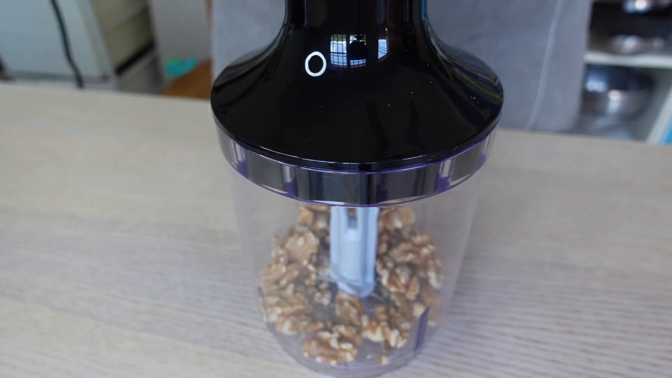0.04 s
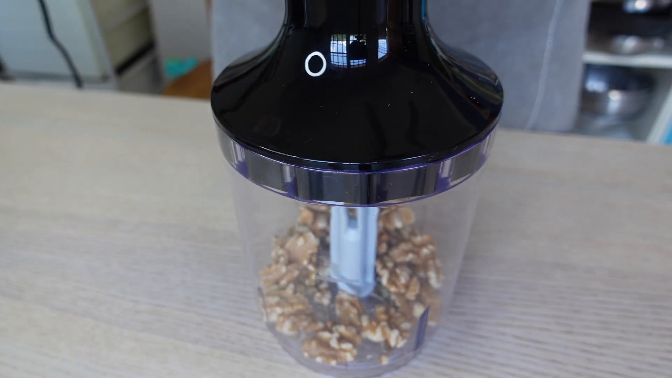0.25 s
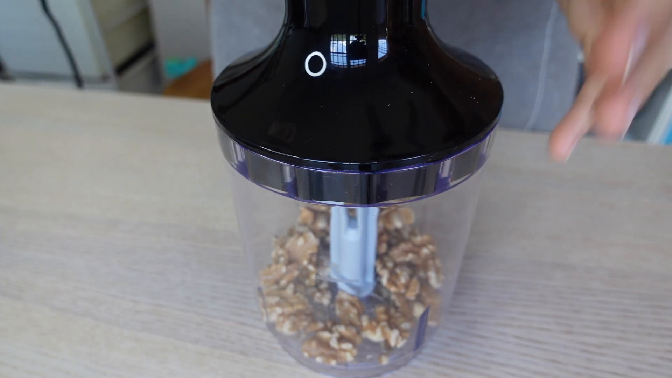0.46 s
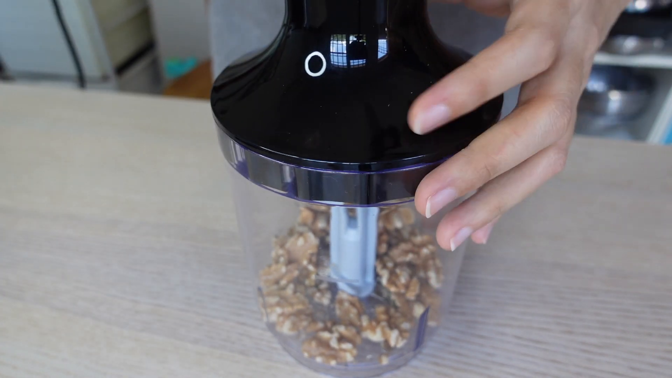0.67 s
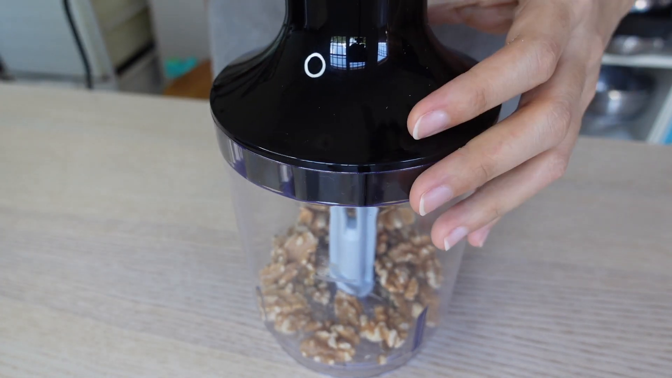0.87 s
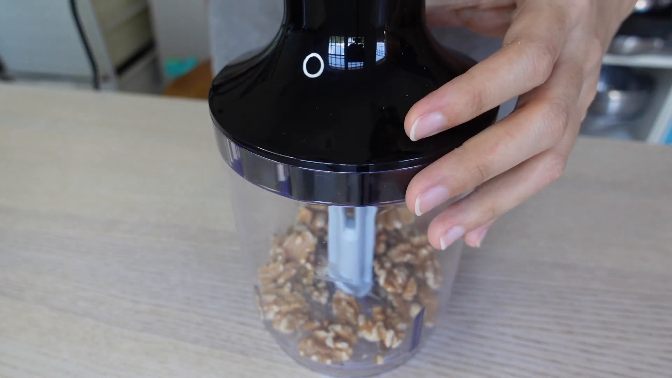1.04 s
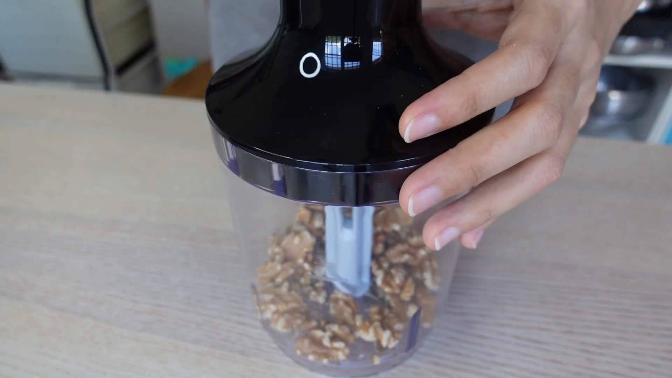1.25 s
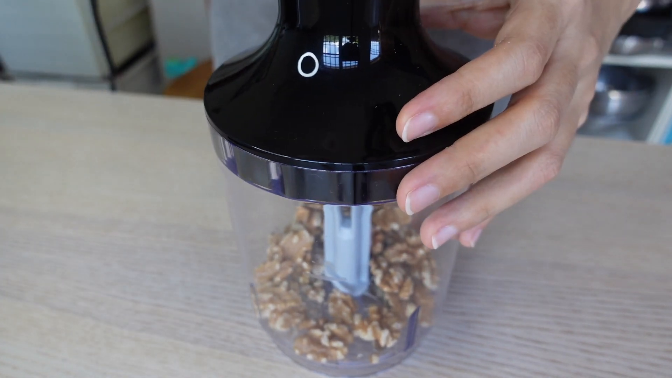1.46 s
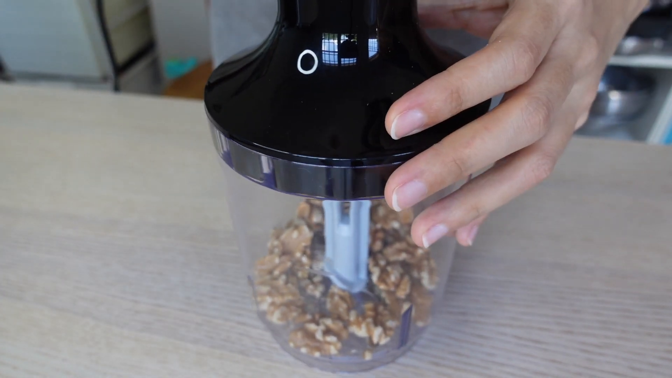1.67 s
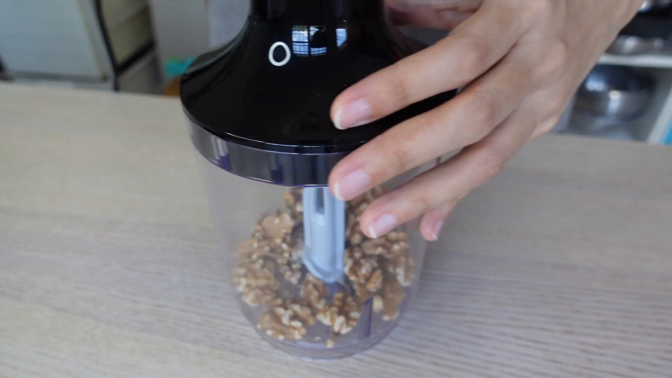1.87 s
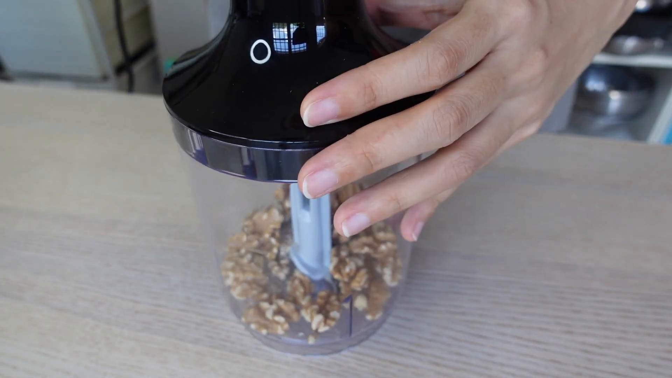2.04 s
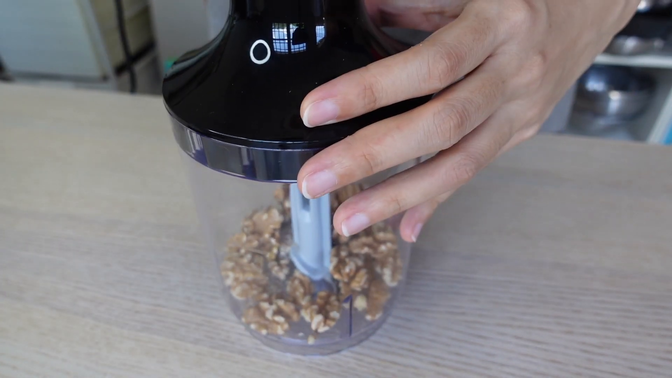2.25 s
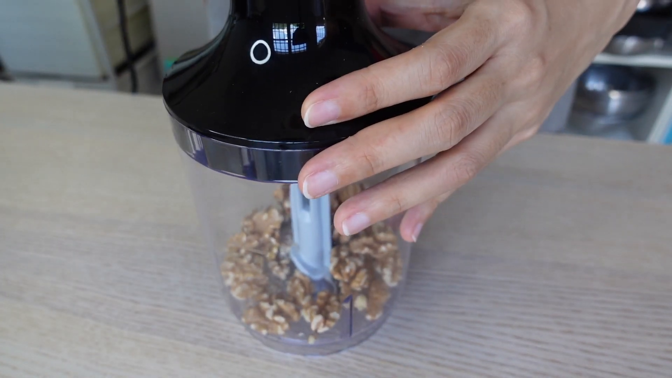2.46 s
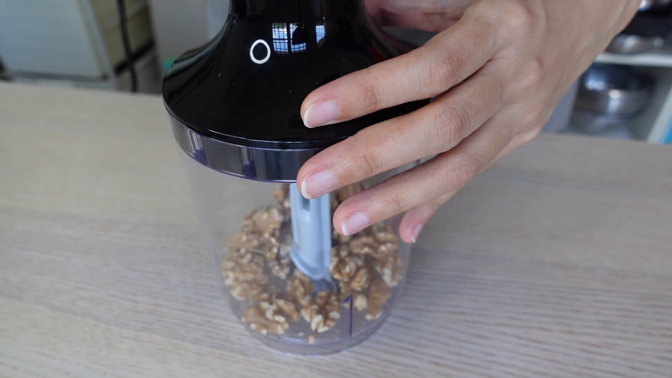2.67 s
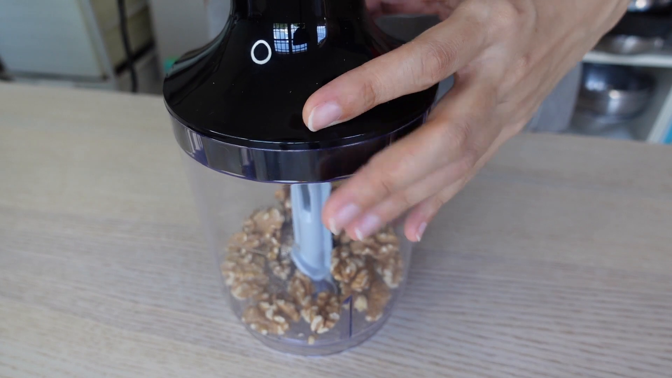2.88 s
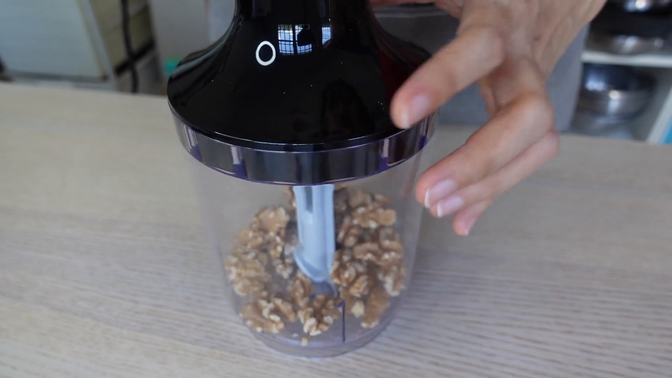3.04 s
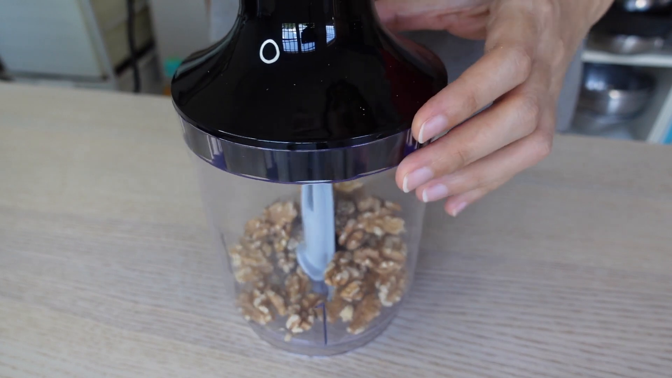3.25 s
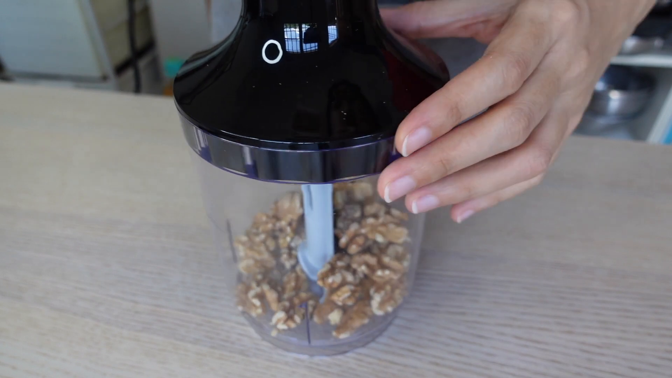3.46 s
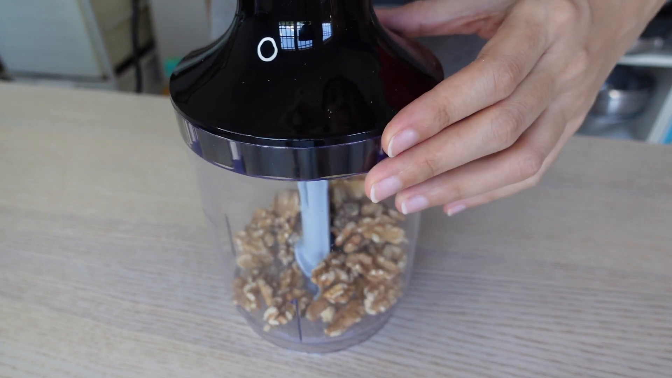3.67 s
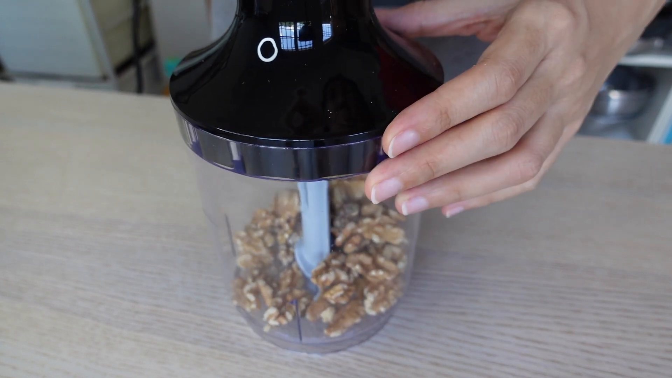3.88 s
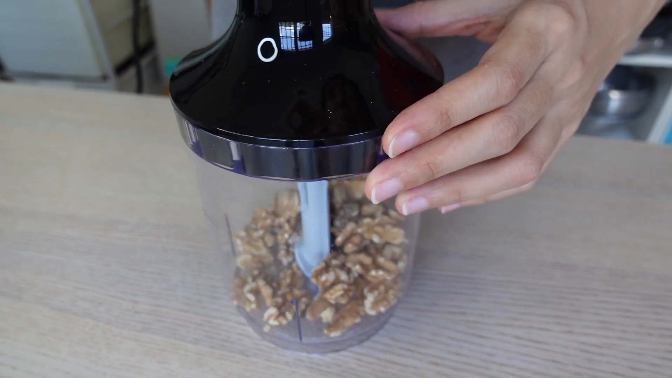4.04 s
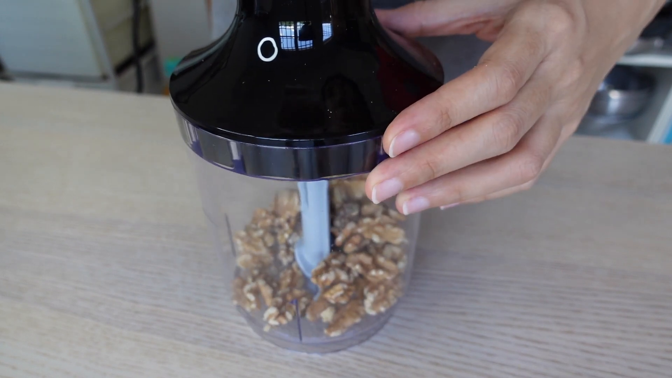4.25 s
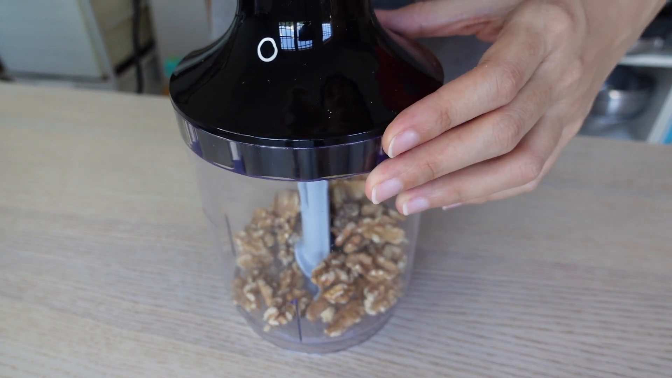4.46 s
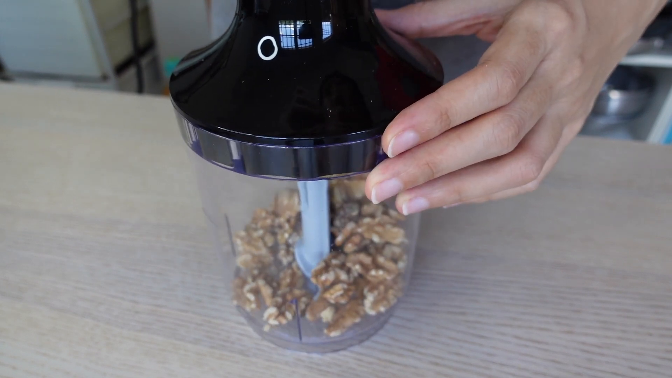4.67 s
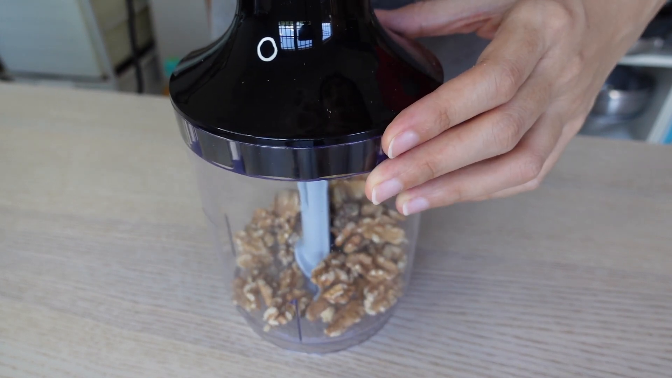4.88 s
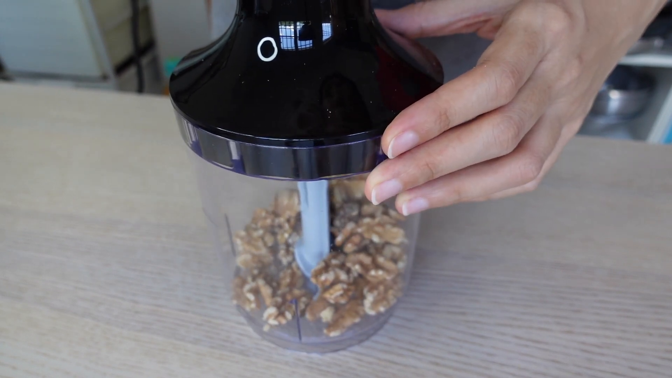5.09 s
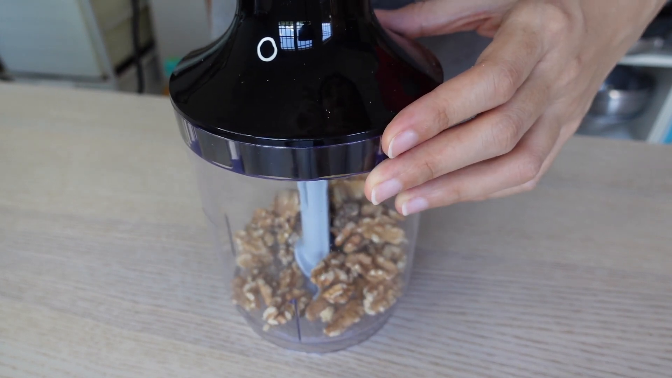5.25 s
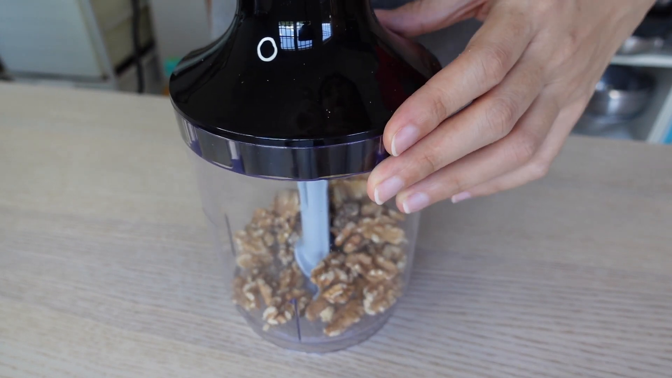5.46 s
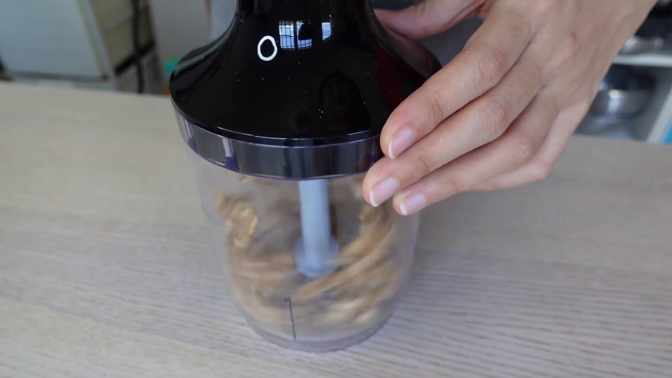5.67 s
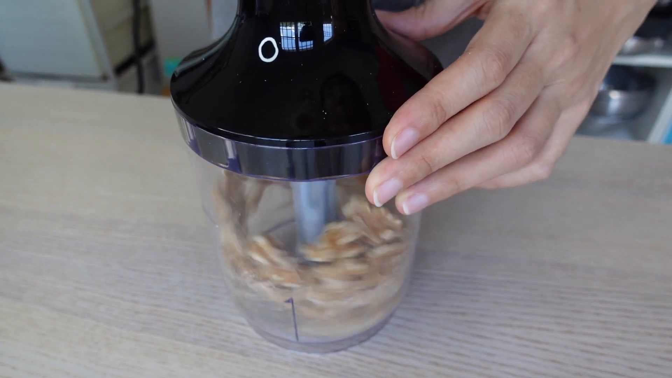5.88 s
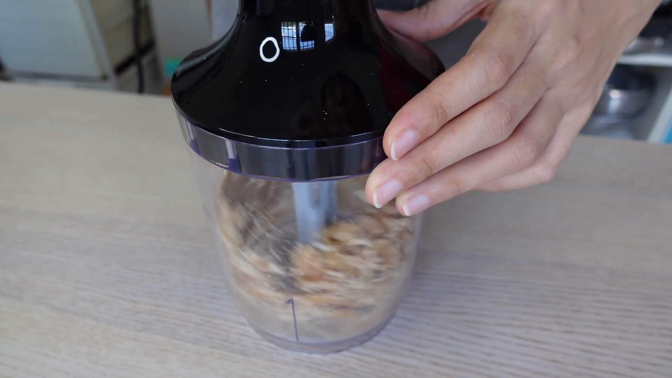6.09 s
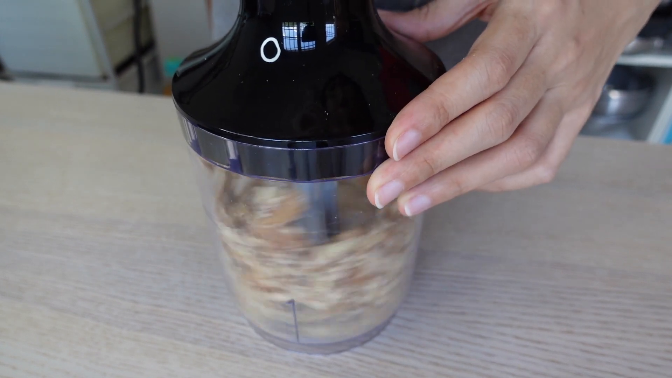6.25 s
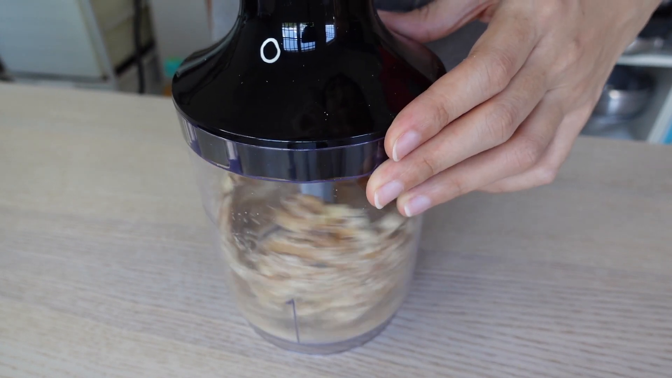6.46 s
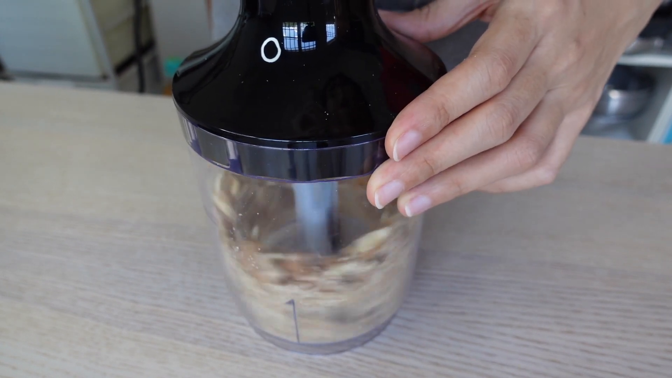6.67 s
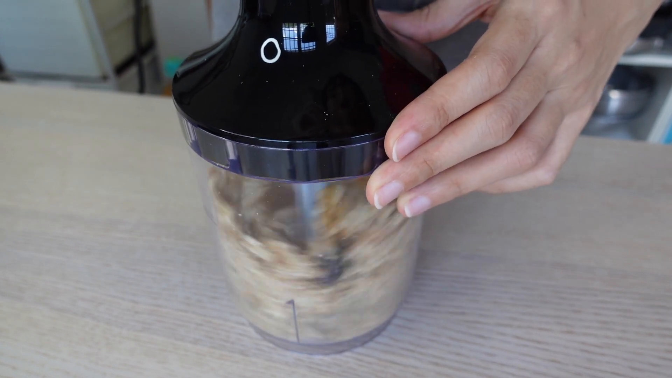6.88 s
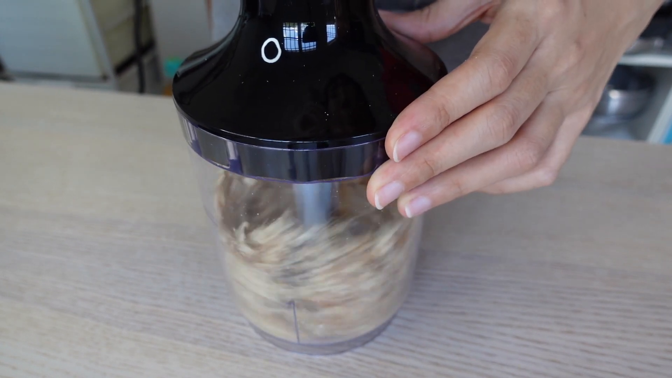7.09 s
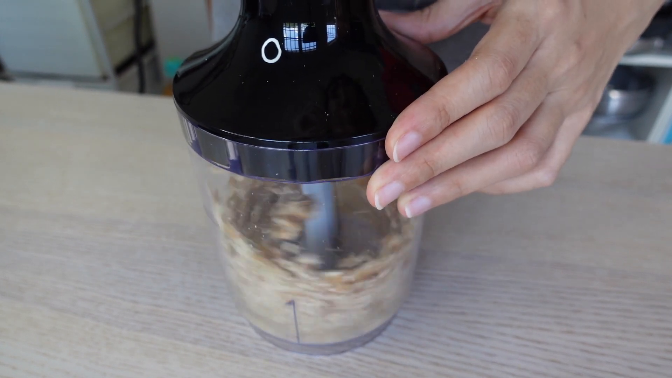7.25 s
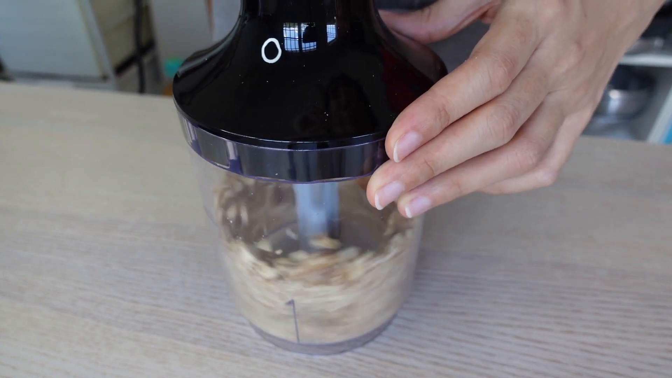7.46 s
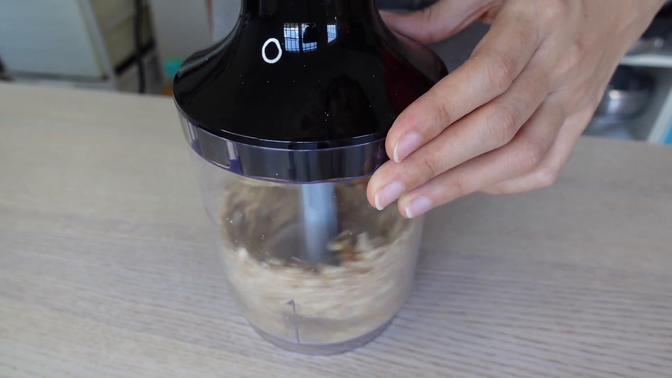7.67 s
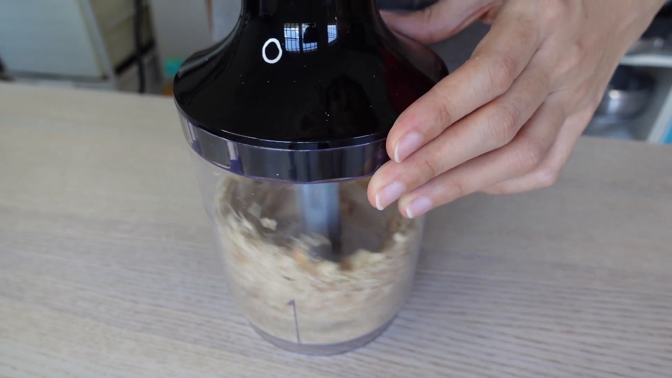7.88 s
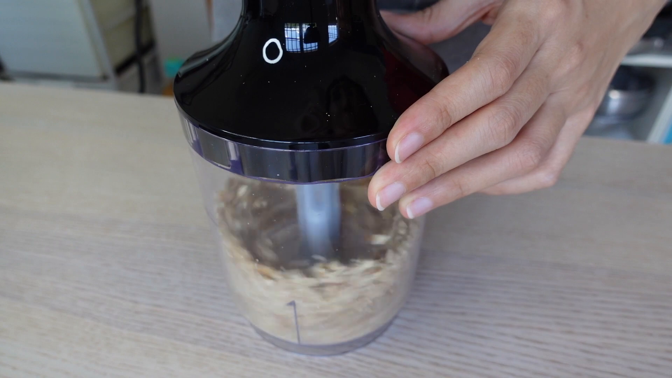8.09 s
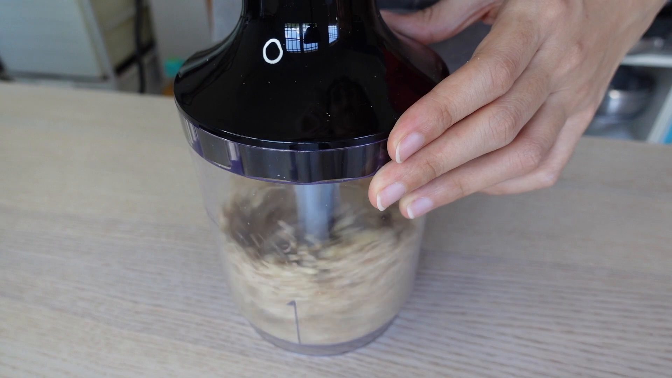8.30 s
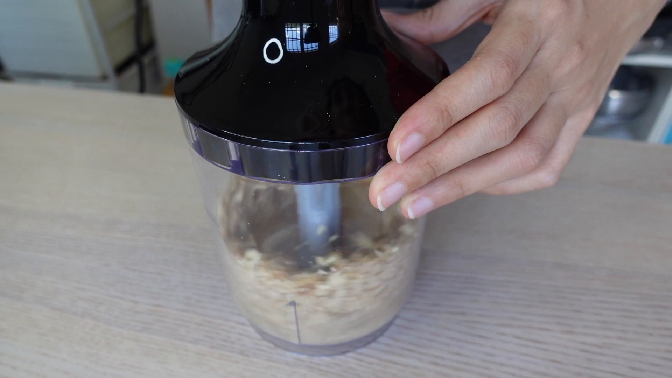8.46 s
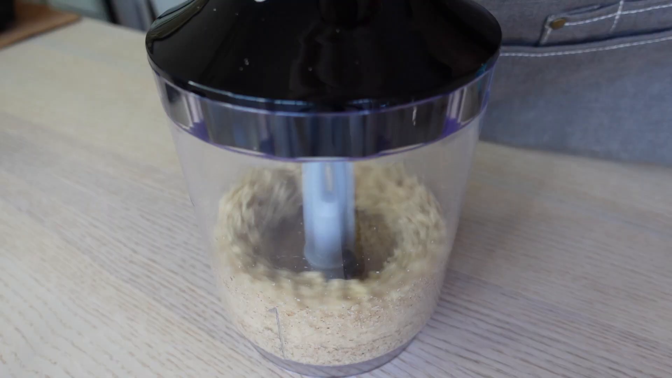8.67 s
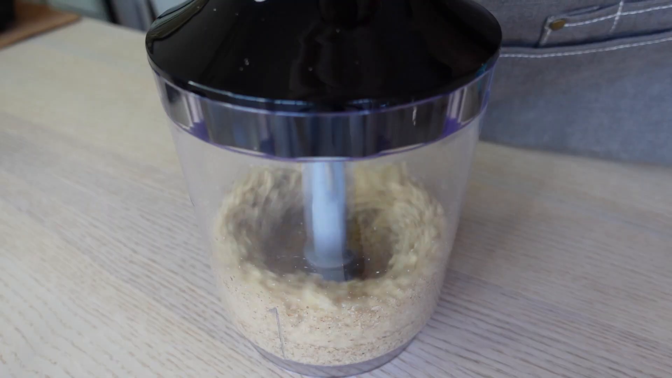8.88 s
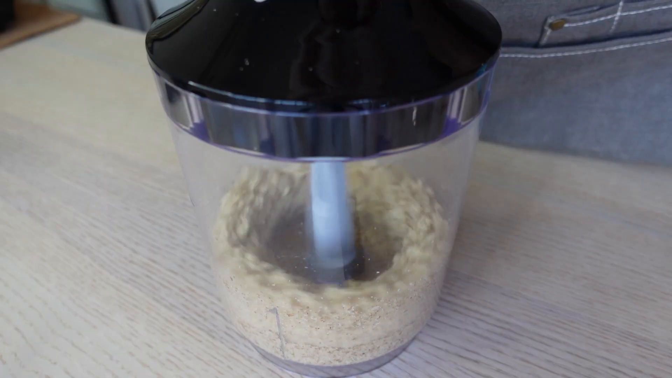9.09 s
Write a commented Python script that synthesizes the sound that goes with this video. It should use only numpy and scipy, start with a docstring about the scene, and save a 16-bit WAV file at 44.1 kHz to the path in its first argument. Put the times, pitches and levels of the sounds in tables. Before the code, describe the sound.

On a wooden table, a hand taps a plastic chopper lid, knocks the bowl and slides it, with two loud cracking snaps around two seconds. Faint rustles and a low drone fill a pause. The button creaks and clicks, and the blade hurls nut pieces at the plastic wall in one loud continuous burst, finishing finer and whinier. Close microphone, little room echo.

```python
"""Nut chopper on a wooden table

A hand taps the lid, the plastic bowl slides, the motor unit snaps in and the button creaks: shaped noise and a thud.
Then the blade flings nut pieces at the wall: random impacts through resonances, over a hum at multiples of the turning
rate. At the end the nuts are fine meal and the motor whines. Low tones over room noise stand for an appliance's drone
and swell with the low ring of the table at the hits near 1.2 and 2.4 s; the sound is nearly mono.
"""
import sys
import numpy as np
from scipy import signal
from scipy.fft import rfft, irfft, next_fast_len
from scipy.io import wavfile
from scipy.ndimage import uniform_filter1d, map_coordinates

SR = 44100
rng = np.random.default_rng(int(sys.argv[2]) if len(sys.argv) > 2 else 0)


def dump(signal):
    """Clip the signal to [-1, 1] and save it as 16-bit WAV at the path in sys.argv[1]."""
    limited = np.clip(np.atleast_2d(signal).T, -1, 1)
    pcm = np.round(limited * 32767).astype(np.int16)
    wavfile.write(sys.argv[1], SR, pcm)


N = 402633
T = np.arange(N) / SR  # time of each sample in seconds

# The chopper in coarse pieces, then in fine meal. Each row: time in seconds, rattle, tumble and knocks in dB.
COARSE_LEVELS = [(5.662, -18.5, -25, -28), (5.68, -19.5, -25, -17), (5.8, -16.5, -23, -22),
                 (6.3, -14.5, -23.5, -26), (7.2, -14.5, -22.5, -27.5), (8, -14.5, -22.5, -24),
                 (8.71, -14.5, -21.5, -25.5)]
MEAL_LEVELS = [(8.71, -15, -21.5, -46), (9.13, -14.5, -20.5, -27)]
# Resonances of the bowl wall, the gear housing and the lid. Each row: centre in Hz, width in Hz, lift in dB.
WALL_MODES = [(2415, 96, 7), (3055, 310, 5.5), (4130, 210, 4.5), (5216, 196, 3), (5920, 290, 4.5),
              (6850, 500, 5.5), (8340, 480, 4.5), (10075, 158, 6)]
HOUSING_MODES = [(2180, 300, -0.5), (2790, 53, 9), (3420, 370, 3), (4290, 150, 8), (5450, 290, 5),
                 (6530, 220, 5.5), (7300, 540, 4.5), (9140, 200, 6), (14240, 300, 14.5)]
LID_MODES = [(2086, 67, 4), (3140, 150, 0.5), (3650, 220, 4.5), (5840, 370, 6.5), (8100, 570, 4)]
# Colours of the rattle and the tumble. Each row: frequency in Hz, relative level in dB per Hz.
COARSE_RATTLE = [(760, -51), (1300, -9), (3500, -6), (5830, 0), (6340, -7.5), (7040, -5), (10300, -11.5),
                 (15700, -22)]
MEAL_RATTLE = [(760, -41.5), (1300, -8.5), (1870, -11.5), (2190, 0), (2590, -13), (3390, -2), (3800, -7),
               (7410, -9), (15700, -36)]
COARSE_TUMBLE = [(15, -61), (25, -63), (80, -96), (91, -43), (112, -6), (151, -15), (212, -3.5), (296, 3.5),
                 (633, -0.5), (854, -6.5), (1090, 0), (1700, -18), (2210, -19), (3740, -120)]
MEAL_TUMBLE = [(15, -68), (25, -38), (80, -42), (114, -8), (165, -19), (231, 6), (266, -2.5), (600, -2),
               (782, -6.5), (1060, -4), (1700, -20), (2210, -64), (3740, -120)]
# Hum of the motor under load, then in meal. Each row: multiple of the turning rate, rms level in dB before wavering.
LOADED_ORDERS = [(1, -47.5), (2, -36.5), (10, -42)]
FREE_ORDERS = [(1, -35), (2, -32.5), (3, -32.5), (5, -30.5), (9, -30), (10, -31), (17, -31.5), (19, -39),
               (24, -36), (27, -34), (36, -40), (120, -55)]
# Taps and snaps. Each row: start in seconds, crack peak in dB, thud peak in dB, crack length in seconds,
# crack centre in Hz, treble edge in dB.
TAPS = [(.462, -40, -40, 0.0032, 4640, -16), (.506, -37, -44, 0.0052, 1950, -22),
        (.70, -44, -34.5, .003, 1900, -20), (.771, -21.5, -21, 0.003, 1950, -33),
        (.777, -28, -50, 0.0021, 5700, -17), (.787, -35, -26.5, 0.0018, 5500, -12),
        (1.0105, -20, -14, 0.00318, 1480, -37), (1.156, -45, -32, 0.0047, 1540, -29.5),
        (1.2025, -22.5, -10.5, 0.0053, 1530, -32), (1.294, -37, -29, .004, 2090, -25),
        (1.3125, -23, -14, 0.0049, 1890, -18), (1.353, -21.5, -26, 0.0018, 6130, -21),
        (1.599, -43, -47, 0.0095, 6400, -7), (1.611, -16.5, -9, 0.0032, 1250, -34.5),
        (2.0095, -5, -14, 0.0062, 1330, -8), (2.026, -26, -12, 0.0034, 1040, -19),
        (2.097, -45, -22.5, .003, 1260, -17.5), (2.293, -15, -21, 0.0084, 3150, -1),
        (2.316, -19, -40, 0.0031, 3680, -8), (2.327, -5.5, -10, 0.0044, 3500, -1.5),
        (3.519, -41, -34.5, 0.0023, 2000, -16), (4.75, -46, -54, .003, 5860, -16),
        (5.657, -6.5, -28, 0.0018, 4080, -4)]
# Button creaks. Each row: start in seconds, peak in dB, length in seconds.
CREAKS = [(5.405, -50.5, 0.0033), (5.418, -39, .008), (5.469, -43.5, 0.013), (5.519, -35.5, .012),
          (5.53, -28.5, 0.0045), (5.537, -36.5, 0.038), (5.593, -30, 0.024), (5.602, -27, .004),
          (5.61, -24.5, 0.0069), (5.62, -28, 0.015), (5.637, -31, 0.012)]
# Resonances of the table top. Each row: centre in Hz, width in Hz, relative level in dB.
TABLE_MODES = [(122, 8, -5), (190, 103, -0.5), (186.3, 7.6, 4.5), (206.6, 6.5, 2), (274, 19, -4),
               (434, 27, -7), (620, 45, -20.5), (947, 187, -33), (1200, 180, -33)]
# Pushes of the bowl over the table. Each row: peak time, rise and fall in seconds (over 20 dB),
# then hiss, drag and table boom in dB.
PUSHES = [(1.93, 0.2, 0.16, -34.5, -29.5, -31.5), (2.049, 0.088, 0.075, -39, -28.5, -28),
          (2.3, 0.0099, .08, -44, -35, -28.5), (2.365, 0.042, .12, -28, -21, -14),
          (2.428, 0.099, 0.097, -44, -39, -17.5), (2.91, .04, .3, -60, -63, -62),
          (3.07, 0.13, 0.253, -52.5, -56, -63), (3.18, 0.086, .22, -48.5, -57, -47),
          (3.37, .1, .4, -53, -70, -50.5), (3.55, .07, 0.094, -47.5, -51, -44)]
# Brushes of a sleeve and fingers. Each row: peak time in seconds, fall in seconds (over 20 dB, sign ignored), level in dB.
BRUSHES = [(.054, 0.2, -45.5), (.2, 0.06, -55), (.326, 0.28, -46.5), (.476, -0.5, -60), (.52, 0.7, -59),
           (.688, 0, -58), (.82, 0.8, -60), (.906, .15, -65), (.99, 0.3, -61), (3.69, 0.23, -55),
           (4.35, 0.06, -49.5), (4.515, 0.4, -58), (4.55, 0, -60), (4.64, 0.5, -67), (4.754, 0.2, -53.5),
           (4.934, 0.05, -53.5)]
# Colours of the plastic foot, its drag and the cloth. Each row: frequency in Hz, relative level in dB per Hz.
FOOT_HISS = [(880, -29.5), (1500, -0.5), (2550, -11.5), (3100, -9), (3390, -9.5), (4420, -3), (6740, 0.5),
             (8710, -7), (15700, -23.5)]
DRAG_COLOUR = [(210, -31.5), (350, 2), (522, -2), (835, -3.5), (937, -4), (1200, -8), (1620, -35),
               (2200, -39), (2860, -48.5), (4840, -120)]
CLOTH_COLOUR = [(410, -39), (700, -18.5), (920, 2.5), (1240, -2), (1380, -6.5), (2290, -1.5), (3170, 1.5),
                (15100, -5), (15700, 1)]
# Low tones of the appliance and the table. Each row: frequency in Hz, level in dB against the swell.
LOW_TONES = [(85, -17), (113, -1), (140.5, -3), (169, -12), (197, -12), (215, -11)]
# Level of the low tones: the drone, swelling with the low ring of the table at the hits near 1.2 and 2.4 s.
# Each row: time in seconds, level in dB.
LOW_TONE_SWELL = [(0.0, -38), (0.2, -43.5), (0.5, -40.5), (0.8, -47), (1.18, -34.5), (1.4, -46),
                  (2.07, -50.5), (2.43, -34), (2.7, -48.5), (3.06, -43.5), (4.55, -46), (5.12, -44.5),
                  (5.5, -49)]
# Colour of the room noise. Each row: frequency in Hz, relative level in dB per Hz.
AIR_COLOUR = [(18, -57), (30, -32), (86, -19), (127, -4.5), (214, -13), (457, -28), (904, -32),
              (1570, -35.5), (2140, -38.5), (2640, -41.5), (15700, -50.5)]
# How long the room rings. Each row: frequency in Hz, time to fall by 60 dB in seconds.
ROOM_DECAY = [(100, 0.55), (500, 0.37), (2000, 0.39), (10000, .15)]
# Stereo width of the room and hands, then of the chopper. Each row: frequency in Hz, side minus mid in dB.
NEAR_WIDTH = [(30, -30), (100, -36), (300, -19), (1000, -14.5), (3500, -21), (5000, -31), (15000, -38)]
CHOPPER_WIDTH = [(120, -62), (220, -34), (500, -24.5), (1000, -29), (1300, -104), (15000, -65)]

LOADED_HZ, FREE_HZ = 110.5, 117.5  # turns of the shaft per second
PATCH_HZ, PATCH_S = 900, .02  # size of the patches of colour as the load tumbles
CREAK_HZ, CREAK_EDGE_DB = 2900, -26
# After each tap the bowl shifts: level against the thud, and times over 20 dB.
SHIFT_DB, SHIFT_RISE_S, SHIFT_FALL_S = -25, 0.0086, 0.09
BOOM_LINGERS = 1.37  # the table top dies away this many times slower than the push
BRUSH_RISE = 0.9  # rise time over fall time
AIR_DB = -48.5  # room noise, before its slow wobble
TOP_HZ = 15750  # nothing is heard above this


def chopper():
    """First the coarse nuts brake the motor, then it runs freer in the meal."""
    coarse = grinding(COARSE_LEVELS, COARSE_RATTLE, WALL_MODES, COARSE_TUMBLE, LOADED_HZ, LOADED_ORDERS,
                      pieces_per_s=1500, beat=0.06, drift=2.88)
    meal = grinding(MEAL_LEVELS, MEAL_RATTLE, HOUSING_MODES, MEAL_TUMBLE, FREE_HZ, FREE_ORDERS,
                    pieces_per_s=2500, beat=0.2, drift=0.02)
    return coarse + meal


def grinding(levels, rattle, lifts, tumble, shaft_hz, orders, pieces_per_s, beat, drift):
    """Nut pieces strike the wall, harder once a turn; the shaft hums at multiples of its turning rate."""
    rattle_gain, tumble_gain, knock_gain = curves(levels)
    turn = 2 * np.pi * shaft_hz * T + drift * wobble(6)  # shaft angle in radians
    swell = amp(0.45 * wobble(18)) * (1 + beat * np.cos(turn))

    # large chips strike dull, small ones tick bright, sharp cracks fill every band
    cracks = .5 * strikes(500, 1.5, 0.00028)
    dull = strikes(pieces_per_s, 2.2, .0007)
    bright = strikes(pieces_per_s, 2.2, .0005)
    chips = filtered(bright - dull, lambda f: f > 4700) + dull  # bright above 4700 Hz, dull below
    impacts = chips + cracks + 0.58 * rng.standard_normal(N)
    wall = coloured(patchy(swell * impacts, depth_db=1.16), rattle, lifts)

    heavy = cracks + strikes(900, 0.43, 0.0026)
    lumps = coloured(patchy(swell * heavy, depth_db=1.14), tumble)
    flying = knocks(900, centre_hz=2821, octaves=0.85, cycles=2.6, spread_db=1.4)

    hum = 0
    for multiple, db in orders:
        level = amp(db + 1.8 * wobble(16)) * np.sqrt(2)  # root 2 turns rms into peak
        hum = hum + level * np.sin(multiple * turn + .6 * wobble(20))
    running = (T >= levels[0][0]) * (T <= levels[-1][0])
    return rattle_gain * wall + tumble_gain * lumps + knock_gain * flying + running * hum


def knocks(per_s, centre_hz, octaves, cycles, spread_db):
    """Flying pieces: each a damped ring at a pitch of its own."""
    draw = rng.random((int(per_s * N / SR), 3))
    when, pitch, size = draw[:, :1], draw[:, 1:2], draw[:, 2:]
    hz = centre_hz * 2 ** (octaves * (2 * pitch - 1))
    t = np.arange(256) / SR
    strength = amp(-spread_db * np.log(size)) * np.sqrt(hz)
    ring = strength * np.exp(-t * hz / cycles) * np.sin(2 * np.pi * hz * t)
    at = (when * N).astype(int) + np.arange(256)
    return unit(np.bincount(at.ravel(), ring.ravel(), N + 256)[:N])


def patchy(x, depth_db):
    """The tumbling load: x under random patches of gain in time and frequency."""
    z = signal.stft(x, nperseg=256)[2]
    tall = max(round(PATCH_HZ * 256 / SR), 1)
    wide = max(round(PATCH_S * SR / 128), 1)
    field = uniform_filter1d(rng.standard_normal(z.shape), tall, 0)
    field = uniform_filter1d(field, wide, 1)
    return signal.istft(z * amp(depth_db * unit(field)), nperseg=256)[1][:N]


def handling():
    """Each tap cracks in the plastic, pushes the table a moment later and echoes; the button creaks."""
    out = np.zeros(N + SR)

    def add(sound, start_s):
        out[round(start_s * SR):][:len(sound)] += sound

    push = np.zeros(SR // 8)
    push[round(.003 * SR)] = 1
    soft = lambda f: modes(TABLE_MODES)(f) / (1 + 1j * f / 550) ** 2  # a soft contact
    fade = np.cos(np.linspace(0, np.pi / 2, 2 * len(push)))
    wood = filtered(np.pad(push, (0, SR // 8)), soft) * fade
    wood = wood / np.abs(wood).max()

    for s, crack_db, thud_db, length, hz, edge_db in TAPS:
        crack = burst(crack_db, length, hz, edge_db, rise=0.0022)
        thud = amp(thud_db) * wood
        # the walls return the average colour of the crack
        even = filtered(push, lambda f: body(hz)(f) + amp(edge_db - 6) * edge(f))
        even = even * np.linalg.norm(crack) / np.linalg.norm(even)
        echo = room(amp(-9.0) * even + amp(-6.0) * thud[:len(even)])
        add(crack, s)
        add(thud, s)
        add(echo, s)
    for s, db, length in CREAKS:
        add(burst(db, length, CREAK_HZ, CREAK_EDGE_DB, rise=0.0019), s)
    return out[:N]


def burst(db, length, hz, edge_db, rise):
    """A noise burst around one broad resonance; the sharp edge on top is over sooner."""
    t = np.arange(SR // 8) / SR

    def noise(seconds):
        return (1 - np.exp(-t / rise)) * np.exp(-(t / abs(seconds)) ** 2) * rng.standard_normal(len(t))

    x = filtered(noise(length), body(hz)) + amp(edge_db) * filtered(noise(0.44 * length), edge)
    return amp(db) * x / np.abs(x).max()


def body(hz):
    """One broad resonance, falling away above, in the ringing lid."""
    return lambda f: modes([(hz, .9 * hz, 0)])(f) / (1 + .5j * f / hz) * lifted(LID_MODES)(f)


def edge(f):
    """The sharp edge of a crack: treble only, in the ringing lid."""
    return (1j * f / (5000 + 1j * f)) ** 2 / (1 + 1j * f / 11000) * lifted(LID_MODES)(f)


def sliding():
    """The bowl's foot hisses over the grain, rings the wall, drags and drives the table top; cloth brushes."""
    s, rise, fall, hiss_db, drag_db, boom_db = np.transpose(PUSHES)
    hiss_gain = strokes(s, rise, fall, hiss_db)
    boom_gain = strokes(s, rise, BOOM_LINGERS * fall, boom_db)
    tap_s, thud_db = np.array([(row[0], row[2]) for row in TAPS]).T
    same = np.ones(len(tap_s))
    shift_gain = strokes(tap_s + SHIFT_RISE_S, SHIFT_RISE_S * same, SHIFT_FALL_S * same, thud_db + SHIFT_DB)
    drag_gain = strokes(s, rise, fall, drag_db) + shift_gain

    foot = coloured(strikes(6000, 1.5, 0.0023), FOOT_HISS, WALL_MODES)
    drag = coloured(strikes(2800, 1.3, 0.0024), DRAG_COLOUR)
    table = unit(filtered(rng.standard_normal(N), lambda f: modes(TABLE_MODES)(f) * 1j * f / (120 + 1j * f)))

    s, fall, db = np.transpose(BRUSHES)
    cloth = strokes(s, BRUSH_RISE * fall, fall, db) * coloured(strikes(6000, 1.1, 0.002), CLOTH_COLOUR)
    return hiss_gain * foot + drag_gain * drag + boom_gain * table + cloth


def strokes(peak_s, rise_s, fall_s, db):
    """Gain of a set of strokes, each climbing to its peak and falling away evenly in dB."""
    coarse = T[::32]
    ahead = coarse - np.reshape(peak_s, (-1, 1))
    rising, falling = -ahead / np.abs(rise_s)[:, None], ahead / np.abs(fall_s)[:, None]
    below = np.where(ahead < 0, rising, falling)  # in steps of 20 dB
    gains = amp(db[:, None] - 20 * np.minimum(below, 10))
    return np.interp(T, coarse, np.sqrt(np.sum(gains ** 2, axis=0)))


def ambience():
    """Room noise and low tones: an appliance's drone, swelling with the table's low ring at two groups of hits."""
    s, db = np.transpose(LOW_TONE_SWELL)
    tones = 0
    for hz, level in LOW_TONES:
        tones = tones + amp(level + 1.9 * wobble(3.2)) * np.sin(2 * np.pi * hz * T + 0.87 * wobble(3))
    air = amp(AIR_DB + wobble(2.1)) * coloured(rng.standard_normal(N), AIR_COLOUR)
    return amp(np.interp(T, s, db)) * tones + air


def room(x):
    """Each frequency of the room's answer dies at its own speed."""
    hz, t, z = signal.stft(rng.standard_normal(SR // 2), SR, nperseg=256)
    decay = amp(-60 * t / along(ROOM_DECAY, hz)[:, None])
    tail = signal.istft(z * decay, SR, nperseg=256)[1]
    return signal.fftconvolve(np.pad(x, (120, 0)), tail / np.linalg.norm(tail))


def strikes(per_s, spread_db, burst_s):
    """Random impacts of uneven size, each a short noise burst."""
    sizes = (rng.random(N) < per_s / SR) * amp(spread_db * rng.exponential(size=N))
    fading = signal.lfilter([1], [1, -np.exp(-1 / (burst_s * SR))], sizes)
    return unit(fading * rng.standard_normal(N))


def coloured(x, spectrum, lifts=()):
    """x with a spectrum, raised at each resonance, at rms 1."""
    return unit(filtered(x, lambda f: amp(along(spectrum, f)) * lifted(lifts)(f)))


def resonance(f, centre, width):
    """Response of one resonance, 1 at its centre."""
    return 1j * f * width / (centre * centre - f * f + 1j * f * width)


def modes(table):
    """Response of a set of resonances, each ringing only after it is struck."""
    return lambda f: sum(amp(db) * resonance(f, c, w) for c, w, db in table)


def lifted(table):
    """A flat response raised at each resonance."""
    return lambda f: 1 + sum((amp(db) - 1) * resonance(f, c, w) for c, w, db in table)


def filtered(x, response):
    """x times a complex response of frequency."""
    m = next_fast_len(x.shape[-1] + SR // 4)
    return irfft(rfft(x, m) * response(np.fft.rfftfreq(m, 1 / SR)), m)[..., :x.shape[-1]]


def wobble(rate):
    """A smooth random curve, with rate random points a second."""
    return map_coordinates(rng.standard_normal(int(N * rate / SR) + 4), [T * rate])


def curves(levels):
    """One gain per sample for each dB column, practically silent outside the rows' times."""
    s, *columns = np.transpose(levels)
    return np.array([amp(np.interp(T, s, db, -200, -200)) for db in columns])


def along(points, hz):
    """Value at each frequency, read between (Hz, value) points on a log axis."""
    f, v = np.transpose(points)
    return np.interp(np.log(hz + 1), np.log(f + 1), v)


def amp(db):
    """Decibels to a plain gain."""
    return 10 ** (np.asarray(db) / 20)


def unit(x):
    """x scaled to an rms of 1."""
    return x / np.sqrt(np.mean(x ** 2) + 1e-20)


def scene():
    """The mix, with a faint diffuse difference between the channels."""
    near = handling() + sliding() + ambience()
    machine = chopper()
    near_side = filtered(room(near)[:N], lambda hz: amp(along(NEAR_WIDTH, hz)))
    machine_side = filtered(room(machine)[:N], lambda hz: amp(along(CHOPPER_WIDTH, hz)))
    mid, side = near + machine, near_side + machine_side
    return np.array([mid + side, mid - side])


def record(dry):
    """The loudest peaks round off; the microphone loses the deep bass; nothing passes above the band limit."""
    rounded = dry / (1 + np.abs(dry / .8) ** 6) ** (1 / 6)
    return filtered(rounded, lambda hz: (hz < TOP_HZ) * (1j * hz / (45 + 1j * hz)) ** 2)


dry = scene()
out = record(dry)
dump(out)
```